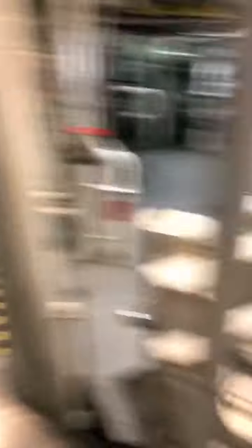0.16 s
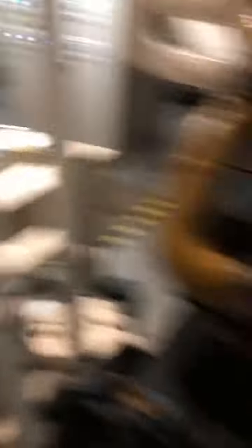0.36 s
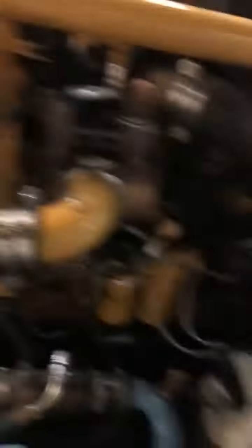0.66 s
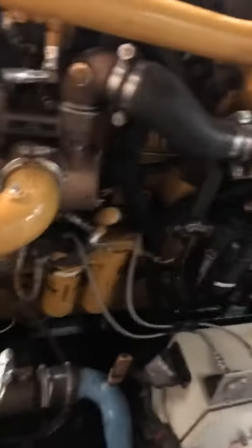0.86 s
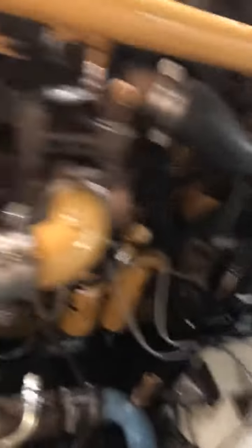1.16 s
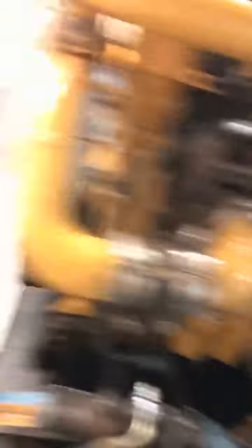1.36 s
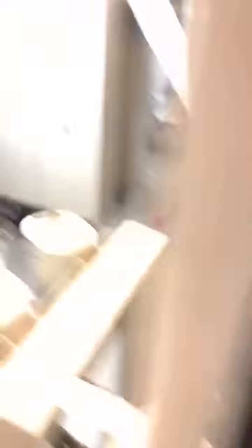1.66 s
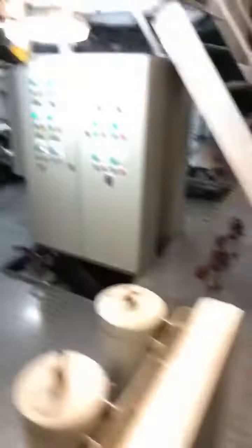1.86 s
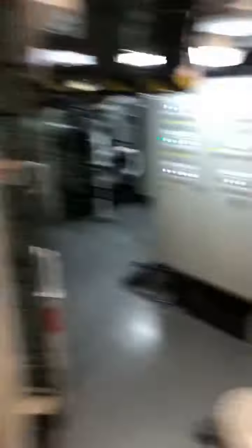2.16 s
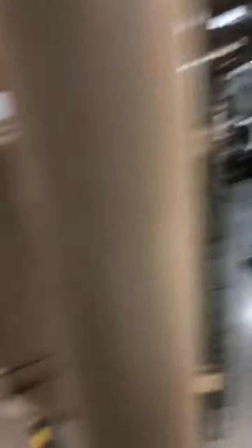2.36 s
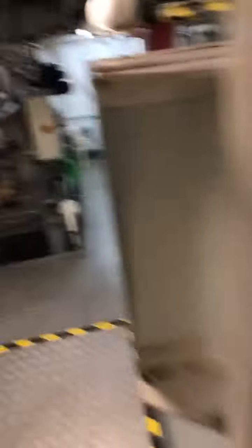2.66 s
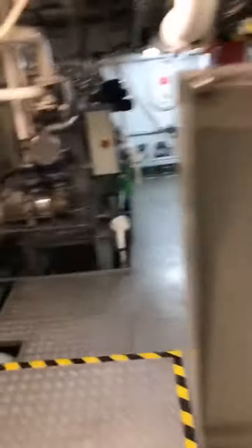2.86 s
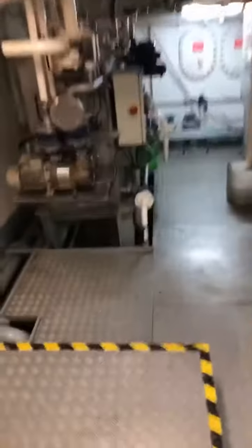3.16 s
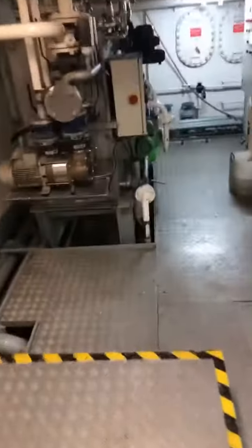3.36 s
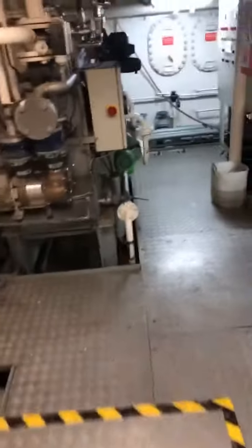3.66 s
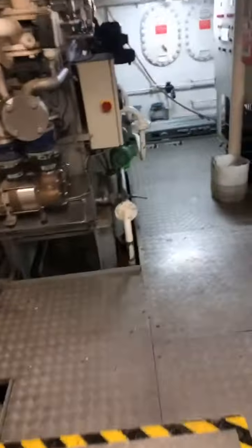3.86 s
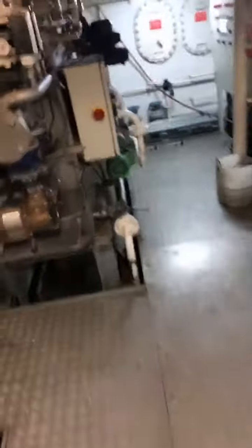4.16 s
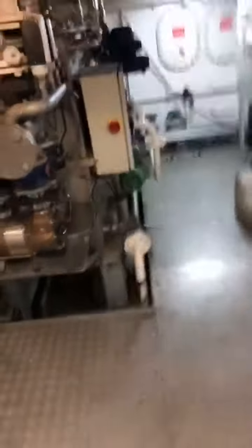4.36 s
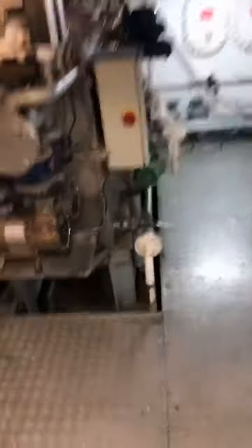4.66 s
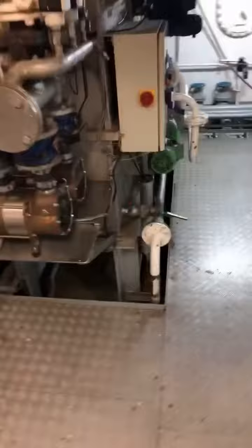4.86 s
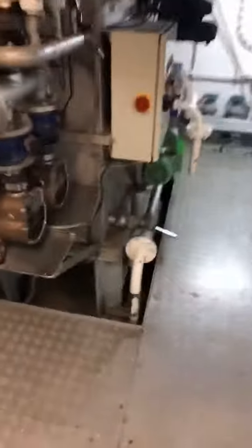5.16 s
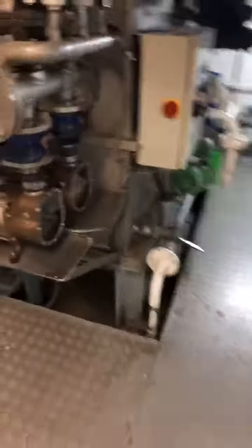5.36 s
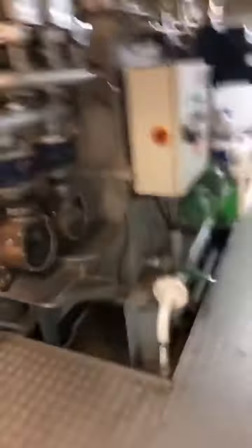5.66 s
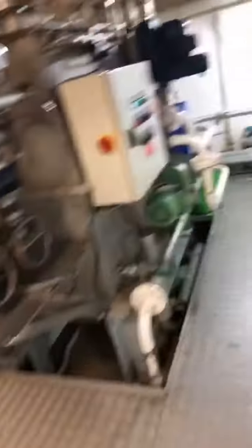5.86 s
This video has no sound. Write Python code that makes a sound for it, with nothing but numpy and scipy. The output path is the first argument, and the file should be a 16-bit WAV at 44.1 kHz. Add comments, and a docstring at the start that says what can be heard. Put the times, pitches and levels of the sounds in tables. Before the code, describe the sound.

Constant engine-room roar: rough low diesel hum and rapid knocking under bright air hiss, a mid-high whine swelling in and out throughout.

```python
"""A diesel drone is heard first, its steady tones swelling and fading as a listener walks through a ship's
engine room. Sines on multiples of the engine cycle form the drone, under standing-wave crests and dead spots.
Pulsed, filtered noise gives the knock; wavering sines a pump's whine; narrow noise bands a turbocharger's
whistle. Random short-time spectra give the roar and hiss behind them. One microphone hears it all."""
import sys
import numpy as np
from scipy import signal
from scipy.io import wavfile
from scipy.ndimage import uniform_filter1d

SR = 44100
rng = np.random.default_rng(int(sys.argv[2]) if len(sys.argv) > 2 else 0)


def digitize_waveform(pressure):
    """Quantize a signal to 16-bit integers and store it at the path in sys.argv[1].

    Rows of a 2-D input are taken as channels; values are limited to [-1, 1].
    """
    field = np.atleast_2d(pressure).T
    bounded = np.clip(field, -1, 1)
    quanta = np.round(bounded * 32767).astype(np.int16)
    wavfile.write(sys.argv[1], SR, quanta)


N = 265904

SOUND_M_S, WALK_M_S = 343, 0.8  # speeds of sound and of the listener

CYCLE_HZ, CYLINDERS = 15.085, 6  # engine cycle rate; each cylinder fires once a cycle
THIN = 8  # the engine tones are computed at SR / THIN
# usual level of a multiple of the engine cycle, before scatter and firing boost: [f/Hz, level/dB]
ORDER_LEVELS = [(30, -65), (75, -46), (105, -41), (200, -43.5), (400, -41), (700, -43.5), (960, -43),
                (1050, -47), (1200, -46), (1500, -50), (1700, -48.5), (1850, -44), (2100, -51.5),
                (2400, -69)]
ORDER_SPREAD_DB = 1.6
FIRING_DB, FIRING_TOP_HZ = 6, 675  # multiples of the firing rate stand out, less so towards the top
# multiples that block and pipes ring with, or smother, in place of the usual: [order index, level/dB]
RINGING_ORDERS = [(3, -47), (4, -55), (8, -46.5), (9, -41), (10, -36.5), (11, -37.5), (14, -37),
                  (15, -47.5), (17, -54), (18, -39), (19, -43), (20, -45.5), (21, -40), (22, -34.5),
                  (23, -47.5), (24, -38), (25, -50), (26, -34.5), (28, -39.5), (33, -40.5), (34, -38),
                  (35, -47), (37, -52), (39, -38), (45, -35), (46, -39), (48, -43.5), (49, -37.5),
                  (51, -41.5), (52, -40.5), (53, -50), (55, -39), (57, -40.5), (60, -39), (63, -40),
                  (71, -42.5), (75, -40), (82, -45.5), (85, -41), (94, -39.5), (98, -44.5)]
# crests of single tones' standing waves, as the walk passes them: [t/s, order index, level/dB]
ORDER_CRESTS = [(0.0, 26, -31), (0.6, 26, -36), (1.9, 26, -35), (0.0, 45, -32), (0.25, 34, -32.5),
                (0.45, 13, -37.5), (0.45, 27, -34.5), (0.5, 18, -30), (0.5, 24, -36.5), (0.75, 32, -35),
                (3.45, 32, -36), (4.95, 32, -36), (0.15, 40, -36), (0.3, 46, -35), (3.45, 46, -35),
                (0.75, 50, -36), (3.0, 51, -35), (0.75, 52, -35), (0.45, 54, -34), (0.75, 55, -35),
                (4.65, 56, -36), (2.55, 57, -35), (0.75, 60, -35), (0.15, 63, -35), (5.25, 63, -35),
                (4.05, 64, -36), (1.65, 39, -36), (0.1, 36, -33), (0.8, 63, -34), (0.9, 20, -42),
                (0.45, 36, -37), (0.78, 34, -31), (0.8, 36, -34), (1.15, 36, -41), (1.15, 34, -27.5),
                (0.7, 16, -34), (1.0, 44, -34), (0.95, 57, -29), (1.05, 49, -30.5), (1.1, 24, -32.5),
                (1.2, 56, -32), (1.25, 38, -33.5), (1.55, 26, -31), (1.65, 60, -32), (1.85, 57, -29),
                (1.9, 30, -34.5), (2.0, 36, -34), (2.0, 49, -32), (2.05, 52, -36), (1.4, 45, -40),
                (1.5, 51, -31), (2.0, 61, -31), (2.0, 63, -31), (2.4, 59, -33), (2.1, 39, -34),
                (2.15, 8, -32.5), (2.3, 51, -28.5), (2.6, 7, -35.5), (2.65, 24, -33.5), (2.8, 45, -33.5),
                (2.8, 58, -33), (3.0, 13, -35), (3.23, 18, -33), (3.0, 21, -31), (3.15, 14, -28),
                (3.15, 55, -31), (3.2, 9, -36), (3.5, 26, -27.5), (3.6, 52, -31), (3.8, 12, -24),
                (4.3, 12, -32), (4.3, 64, -35), (4.8, 39, -33.5), (5.7, 18, -34), (4.2, 27, -32.5),
                (4.45, 11, -32), (4.4, 52, -34), (4.6, 57, -29.5), (4.7, 52, -28), (5.15, 46, -34),
                (5.3, 57, -28.5), (5.35, 56, -33), (5.65, 14, -34), (5.65, 21, -31.5), (5.65, 54, -31.5),
                (6.0, 12, -32), (0.15, 28, -33), (0.15, 57, -34), (0.19, 52, -33.5), (0.34, 37, -36),
                (0.47, 30, -39), (0.8, 21, -33), (0.98, 46, -33), (1.22, 64, -38), (1.34, 55, -33),
                (1.36, 63, -31), (1.7, 12, -37.5), (1.94, 53, -31), (2.15, 60, -32), (2.2, 12, -44),
                (2.65, 50, -31.5), (2.69, 56, -39), (3.0, 39, -34), (3.02, 52, -31), (3.05, 64, -34),
                (3.18, 34, -35), (3.36, 57, -32), (3.73, 34, -41), (3.75, 16, -34.5), (3.7, 11, -32),
                (5.3, 11, -33), (0.2, 13, -35.5), (1.05, 13, -38.5), (2.3, 13, -38), (0.6, 9, -39),
                (3.3, 20, -37.5), (4.6, 20, -39), (5.6, 20, -41), (0.1, 27, -34), (1.2, 27, -40),
                (1.0, 5, -43), (5.6, 5, -42), (2.0, 6, -40), (2.9, 6, -40), (1.8, 15, -38),
                (0.1, 24, -33.5), (3.0, 30, -36), (1.6, 29, -39), (4.8, 18, -38.5), (4.5, 96, -34),
                (5.4, 96, -34), (1.05, 85, -33), (2.2, 85, -32), (4.03, 54, -32), (4.14, 47, -31.5),
                (4.18, 49, -42), (4.33, 29, -38), (4.76, 43, -41), (4.88, 49, -31), (5.41, 27, -38),
                (5.5, 52, -32), (5.6, 60, -32), (5.72, 33, -34), (5.73, 55, -34), (5.93, 40, -37),
                (5.94, 52, -41)]
CREST_WAVES, CREST_MOST_S = 0.29, 0.4  # bell width in wavelengths walked, and its upper limit
# dead spots of single tones' standing waves: [t/s, order index, depth/dB]
ORDER_TROUGHS = [(.3, 7, -9), (5.7, 8, -20), (1.5, 9, -12), (4.95, 9, -8), (3.8, 10, -15), (1.7, 11, -9),
                 (2.4, 11, -8), (.15, 12, -5), (2.86, 12, -9), (4.95, 12, -10), (0.72, 14, -7),
                 (4.4, 14, -9), (3.3, 15, -10), (2, 16, -7), (3.34, 16, -8), (2.14, 18, -12),
                 (1.4, 19, -10), (3.5, 19, -9), (1.6, 21, -7), (4.2, 21, -8), (4.7, 22, -10), (1.7, 24, -9),
                 (3.45, 24, -6), (3.97, 26, -8), (4.1, 30, -16), (5.4, 30, -9), (4.0, 34, -9),
                 (5.25, 34, -18), (3.45, 34, -7), (5.85, 36, -12), (.3, 39, -7), (.7, 45, -9),
                 (2.25, 45, -8), (4.65, 45, -10), (5.25, 45, -12), (4.95, 51, -12), (5.5, 55, -15),
                 (2.25, 63, -11)]
TROUGH_SHARE = 0.47  # width of a dead spot relative to a crest
# a second machine's hum, just above one order and beating with it: [t/s, level/dB]
HUM_LEVELS = [(0, -58), (1.5, -55), (2.3, -33.5), (3.8, -31.5), (5, -42), (6.03, -46)]
HUM_ORDER, HUM_BEAT_HZ, HUM_IN_STEP_S = 9, 2.2, 3.25

KNOCK_HZ, KNOCK_WIDTH_HZ, KNOCK_T60_S = 834, 263, 0.046  # band centre, bandwidth, 60 dB decay time
KNOCK_DB, KNOCK_SPREAD_DB = -34.5, 5  # rms before it follows the hiss; spread between cylinders

# turbocharger whistle before wobble and pulsing: [t/s, pitch f/Hz, core level/dB]
TURBO_TRACK = [(0, 8200, -47), (.15, 8180, -49), (.5, 8165, -43.5), (.9, 8160, -44), (1.2, 8175, -41),
               (1.6, 8185, -48), (1.95, 8190, -45), (2.45, 8215, -47), (2.9, 8205, -48), (3.5, 8240, -46),
               (4.0, 8260, -45.5), (4.5, 8265, -44), (4.95, 8225, -47), (5.1, 8225, -42.5),
               (5.6, 8205, -46), (6.03, 8190, -41)]

WHINE_HZ = 1747.8
# pump whine between its crests: [t/s, tone level/dB, octave level/dB]
WHINE_LEVELS = [(0, -35, -50), (2.4, -36.5, -50), (3.5, -32, -55), (4.5, -39, -55), (6.03, -35, -57)]
# crests of the whine along the walk: [t/s, bell width/s, level/dB]
TONE_CRESTS = [(.28, 0.025, -30), (.95, 0.081, -30), (1.3, 0.07, -31), (1.68, 0.064, -27.5),
               (1.88, 0.05, -27), (2.37, 0.064, -28.5), (2.74, 0.043, -24.5), (2.93, 0.068, -26.5),
               (3.22, 0.13, -22), (3.66, 0.06, -26.5), (3.97, 0.12, -23.5), (4.2, 0.12, -28.5),
               (4.75, 0.093, -26.5), (4.98, 0.079, -20.5), (5.24, 0.07, -26), (5.43, 0.06, -28.5),
               (5.61, 0.045, -24.5), (5.72, 0.075, -23), (6.03, 0.053, -27)]
# crests of its octave along the walk: [t/s, bell width/s, level/dB]
OCTAVE_SWELLS = [(2.98, .05, -42), (3.67, 0.04, -43), (3.92, 0.14, -46), (4.5, 0.13, -44), (5.06, .06, -40),
                 (5.24, .04, -43), (5.4, .04, -41.5), (5.6, 0.073, -42), (5.97, 0.037, -43)]

# spectral shape of the roar of fans, air and casings: [f/Hz, relative level/dB]
ROAR_SHAPE = [(20, -71), (50, -54), (100, -61), (180, -53), (300, -55), (640, -57), (720, -53), (870, -52),
              (960, -53.5), (1280, -51.5), (1500, -50), (1620, -55), (2050, -56), (2400, -72.5)]
ROAR_FOLLOWS = 0.4  # dB of roar per dB of hiss
ROAR_SHELTER = 0.6  # share of the shelter that the diffuse roar feels
# spectral shape of the hiss: [f/Hz, relative level/dB]
HISS_SHAPE = [(1290, -16), (2200, -1.5), (2700, -7.5), (3200, -10), (3620, -9), (5020, -13.5),
              (6630, -13.5), (8330, -11), (8900, -13.5), (13900, -25.5), (15500, -40)]

# along the walk: [t/s, hiss level/dB, bass gain/dB, low-middle gain/dB]
WALK_LEVELS = [(0, -30, -3.5, 0.5), (.5, -28.5, -4.5, 0), (1, -28.5, -2.5, 2), (1.4, -29.5, -1, 1.5),
               (1.8, -29, -2, -2), (2.3, -30, 0, 0.5), (2.8, -30, 2, -3.5), (3.5, -30.5, 3.5, 0),
               (3.9, -31.5, -0.5, 0), (4.3, -31, -3, -3.5), (4.7, -29.5, -1.5, -2.5), (5.2, -29.5, 1, -0.5),
               (5.6, -30, 0, -3), (6.03, -29.5, 1, 1)]
# shading or lift of the deep rumble along the walk: [t/s, gain/dB]
RUMBLE_GAIN = [(0, 3), (1.4, -1), (2.3, -6), (3, -7), (4.3, -2), (6.03, 2)]

EDGE_HZ = 15660  # upper band limit


def engine(echo_hz=800, smear_cycles=.75, surge_cycles=.002):
    """Harmonic synthesis: a periodic engine sounds at cycle multiples; short waves are mostly echo and fade fast."""
    slow = np.arange(0, N / SR + .02, .01)
    t = np.arange(N // THIN + 1) * THIN / SR
    out = np.zeros(len(t))
    cycles = CYCLE_HZ * t + surge_cycles * wander(t, top_hz=4)  # the crank runs a little early or late
    firing_phase = rng.random(CYLINDERS)  # alike firings keep tones one firing rate apart partly in step
    for k in range(2, 160):
        field = order_field(k, slow, echo_hz)
        phase = k * cycles + firing_phase[k % CYLINDERS] + smear_cycles * rng.random()
        out += (np.interp(t, slow, field) * np.exp(2j * np.pi * phase)).real
    return np.sqrt(2) * signal.resample_poly(out, THIN, 1)[:N]


def order_field(k, t, echo_hz):
    """Standing waves: direct and echoed sound of one multiple add to crests and dead spots along the walk."""
    hz = k * CYCLE_HZ
    echo = hz ** 2 / (hz ** 2 + echo_hz ** 2)  # share of the power
    field = gain_of(order_db(k) + shelter_db(hz, t)) * direct_and_echo(hz, t, echo)

    wave_s = SOUND_M_S / hz / WALK_M_S  # time to walk one wavelength
    width = min(CREST_WAVES * wave_s, CREST_MOST_S)
    crests = [(s, width, db) for s, order, db in ORDER_CRESTS if order == k]
    field = joined(field, swells(crests, t))
    for s, order, depth_db in ORDER_TROUGHS:
        if order == k:
            field = field * gain_of(depth_db * bell(t, s, width * TROUGH_SHARE))

    if k == HUM_ORDER:
        beat = np.exp(2j * np.pi * HUM_BEAT_HZ * (t - HUM_IN_STEP_S))
        field = field + gain_of(follow(HUM_LEVELS, t)[0]) * beat
    return field


def order_db(k):
    """Forced response: firing multiples stand out, and resonance sets chosen multiples' levels outright."""
    hz = k * CYCLE_HZ
    usual = read(ORDER_LEVELS, hz) + ORDER_SPREAD_DB * rng.standard_normal()
    firing = FIRING_DB / (1 + (hz / FIRING_TOP_HZ) ** 4) * (k % CYLINDERS == 0)
    return {order: db for order, db in RINGING_ORDERS}.get(k, usual + firing)


def knock():
    """Impact excitation: each firing rattles the block briefly, and every cylinder has its own strength."""
    firings = np.arange(N) / SR * CYCLE_HZ * CYLINDERS
    strength = gain_of(KNOCK_SPREAD_DB * rng.standard_normal(CYLINDERS))
    cylinder = firings.astype(int) % CYLINDERS
    blows = np.diff(np.floor(firings), prepend=0) * strength[cylinder]
    decay = gain_of(-60 / KNOCK_T60_S / SR)  # per sample
    rattle = signal.lfilter([1], [1, -decay], blows) * rng.standard_normal(N)
    edges = KNOCK_HZ + KNOCK_WIDTH_HZ * np.array([-.5, .5])
    block = signal.sosfilt(signal.butter(2, edges, "band", fs=SR, output="sos"), rattle)
    hiss_db = follow(WALK_LEVELS, np.arange(N) / SR)[0]
    return gain_of(KNOCK_DB + hiss_db - hiss_db.mean()) * evened(block)


def turbo(core_hz=40.0, skirt_hz=200.0, skirt_db=-2.5, puff=.15, puff_s=1.3, wobble_hz=12.0):
    """Narrow-band noise: a fluttering blade tone in a wider skirt, pulsed once a cycle by exhaust puffs."""
    t = np.arange(N) / SR
    slow = t[::256]
    hz, db = follow(TURBO_TRACK, t)
    hz = hz + wobble_hz * np.interp(t, slow, wander(slow, top_hz=15))
    out = 0
    # offset/Hz, bandwidth of each of two equal poles/Hz, level relative to the core/dB
    for shift, width, part_db in [(1, core_hz, 0), (-60, skirt_hz, skirt_db)]:
        r = np.exp(-np.pi * width / SR)
        grain = rng.standard_normal(N) + 1j * rng.standard_normal(N)
        flutter = signal.lfilter([1], np.poly([r, r]), grain)
        carrier = np.exp(2j * np.pi * np.cumsum(hz + shift) / SR)
        out = out + gain_of(part_db) * evened((flutter * carrier).real)
    puffs = 1 + puff * np.cos(2 * np.pi * CYCLE_HZ * (t - puff_s))  # one peak falls at puff_s
    return gain_of(db) * out * puffs


def whine(sway_cycles=0.23, echo=0.62, rough=0.07):
    """Interference: echoes make a pump's gear tone and its octave waver; uneven teeth roughen them."""
    t, out = np.arange(N) / SR, 0
    slow = t[::256]
    turns = WHINE_HZ * t + sway_cycles * np.interp(t, slow, wander(slow, top_hz=6))
    levels = follow(WHINE_LEVELS, slow)
    for k, db, crests in zip((1, 2), levels, (TONE_CRESTS, OCTAVE_SWELLS)):
        faint = gain_of(db) * direct_and_echo(k * WHINE_HZ, slow, echo)
        field = np.interp(t, slow, joined(faint, swells(crests, slow)))
        teeth = patches(2, len(slow), 1, 3)
        field = field * (1 + rough * np.interp(t, slow, teeth[0] + 1j * teeth[1]))
        out = out + (field * np.exp(2j * np.pi * k * turns)).real
    return np.sqrt(2) * out


def roar(patchy_db=1.15, gain_db=12):
    """Diffuse field: low and middle noise, in patches that drift as the room's resonances pass by."""
    hz, t = np.fft.rfftfreq(2048, 1 / SR), np.arange(N // 512 + 5) * 512 / SR
    hiss_db = follow(WALK_LEVELS, t)[0]
    walk_db = ROAR_FOLLOWS * (hiss_db - hiss_db.mean())
    top_db = -np.maximum(hz - ROAR_SHAPE[-1][0], 0) / 10  # hands over to the hiss
    drift = patches(len(hz), len(t), 6, 25)
    db = (read(ROAR_SHAPE, hz) + top_db)[:, None] + walk_db + patchy_db * drift
    shelter = ROAR_SHELTER * shelter_db(hz[:, None], t)
    return gain_of(gain_db) * noise(db + shelter, size=2048)


def hiss(patchy_db=0.77, flicker_db=0.28):
    """Broadband noise: treble of valves and rushing air, flickering a little in all bands at once."""
    hz, t = np.fft.rfftfreq(512, 1 / SR), np.arange(N // 128 + 5) * 128 / SR
    foot_db = np.minimum(hz - HISS_SHAPE[0][0], 0) / 10  # falls away below the first point
    drift = patches(len(hz), len(t), 8, 20)
    flicker = patches(1, len(t), 1, 8)
    shape_db = (read(HISS_SHAPE, hz) + foot_db)[:, None]
    air = noise(shape_db + patchy_db * drift + flicker_db * flicker, size=512)
    return evened(air) * gain_of(follow(WALK_LEVELS, np.arange(N) / SR)[0])


def shelter_db(hz, t):
    """Shadowing: cabinets and pillars shade or lift rumble, bass and low middle of engine tones and roar."""
    bass_db, middle_db = follow(WALK_LEVELS, t)[1:]
    deep = 1 / (1 + (hz / 60) ** 4)
    bass = bell(np.log(hz / 90 + 1e-9), 0, 0.54)
    middle = bell(np.log(hz / 350 + 1e-9), 0, 0.4)
    return deep * follow(RUMBLE_GAIN, t)[0] + bass * bass_db + middle * middle_db


def scattered(hz, t):
    """Doppler effect: echoes from all sides, each shifted a little by the walk; complex gain of unit mean power."""
    side, phase = rng.random((2, 16, 1))
    shift_hz = hz * WALK_M_S / SOUND_M_S * np.cos(np.pi * side)
    return np.exp(2j * np.pi * (shift_hz * t + phase)).sum(0) / 4


def direct_and_echo(hz, t, echo):
    """Superposition: a steady direct wave and scattered echoes share the power."""
    return np.sqrt(1 - echo) + np.sqrt(echo) * scattered(hz, t)


def joined(field, crest):
    """Power addition: a crest adds its power to the drifting field."""
    return np.hypot(abs(field), crest) * np.exp(1j * np.angle(field + crest))


def swells(rows, t):
    """Amplitude envelope: a sum of bells from rows of time, width and level."""
    return sum(gain_of(db) * bell(t, s, width) for s, width, db in rows)


def bell(x, centre, width):
    """Gaussian curve of unit peak; width is its standard deviation."""
    return np.exp(-.5 * ((x - centre) / width) ** 2)


def noise(db, size):
    """Fourier synthesis: random short-time spectra under a dB field of bins by frames."""
    a, b = rng.standard_normal((db.shape[1], db.shape[0], 2)).T
    spectra = (a + 1j * b) * gain_of(db)
    return signal.istft(spectra, nperseg=size, noverlap=size - size // 4)[1][:N]


def patches(bins, frames, wide, long):
    """Moving average: a smooth random field of unit rms."""
    field = rng.standard_normal((frames, bins)).T
    return evened(uniform_filter1d(uniform_filter1d(field, wide, 0), long, 1))


def wander(t, top_hz):
    """Random-phase sum: slow sines, weaker towards the top, give an irregular curve of unit rms."""
    rates = np.geomspace(.3, top_hz, 20)
    return evened(sum(np.sin(2 * np.pi * (f * t + rng.random())) / np.sqrt(f) for f in rates))


def gain_of(db):
    """Logarithmic level: decibels to amplitude gain."""
    return 10 ** (np.asarray(db) / 20)


def evened(x):
    """Normalization: scales to unit rms."""
    return x / np.sqrt(np.mean(abs(x) ** 2) + 1e-20)


def read(points, hz):
    """Spectral interpolation on a log-frequency axis."""
    f, value = np.transpose(points)
    return np.interp(np.log(hz + 1), np.log(f + 1), value)


def follow(rows, t):
    """Linear interpolation: every column of a curve at times t."""
    s, *columns = np.transpose(rows)
    return [np.interp(t, s, c) for c in columns]


def scene():
    """Superposition: all sources add at one microphone, given as two equal channels."""
    mono = engine() + knock() + turbo() + whine() + roar() + hiss()
    return np.array([mono, mono])


def record(dry):
    """Band limitation: a linear-phase low-pass filter removes the highest treble."""
    lowpass = signal.firwin(511, EDGE_HZ, window=("kaiser", 9), fs=SR)
    return signal.oaconvolve(dry, lowpass[None], "same")


dry = scene()
out = record(dry)
digitize_waveform(out)
```